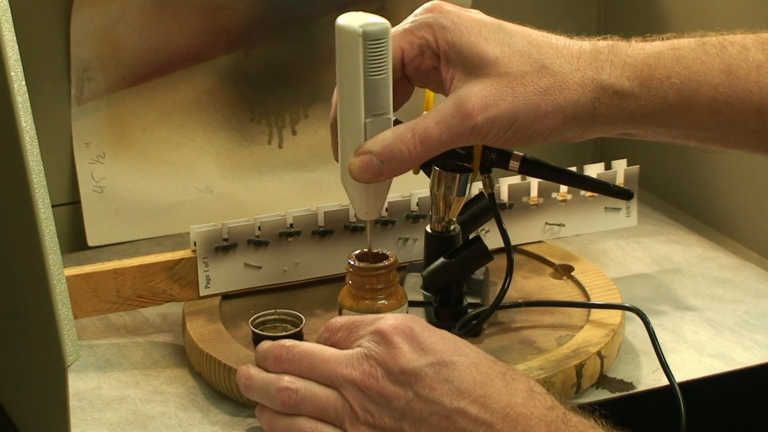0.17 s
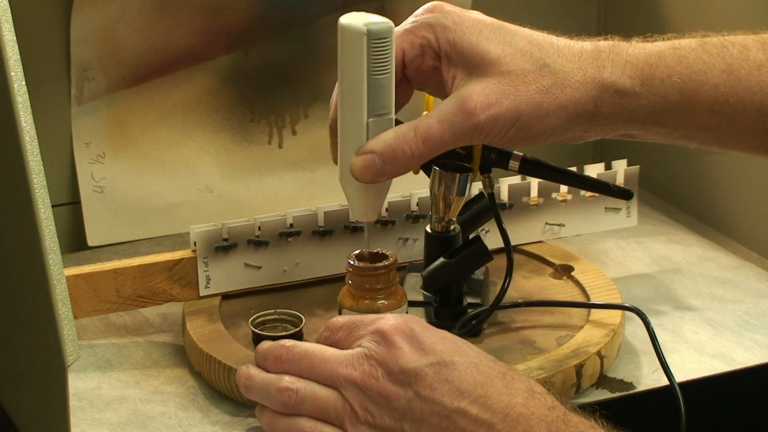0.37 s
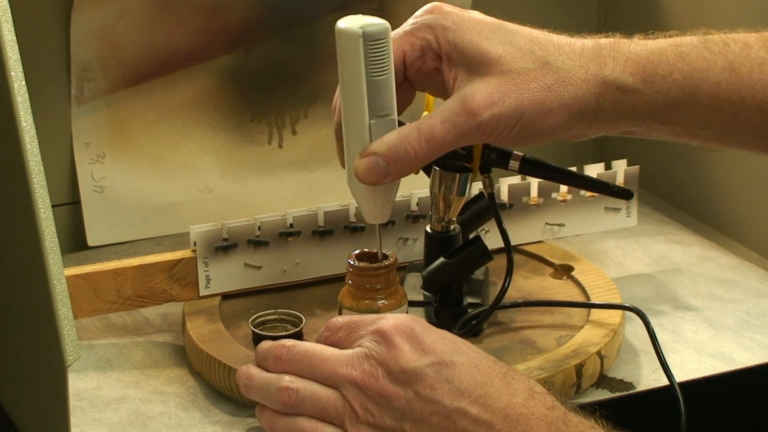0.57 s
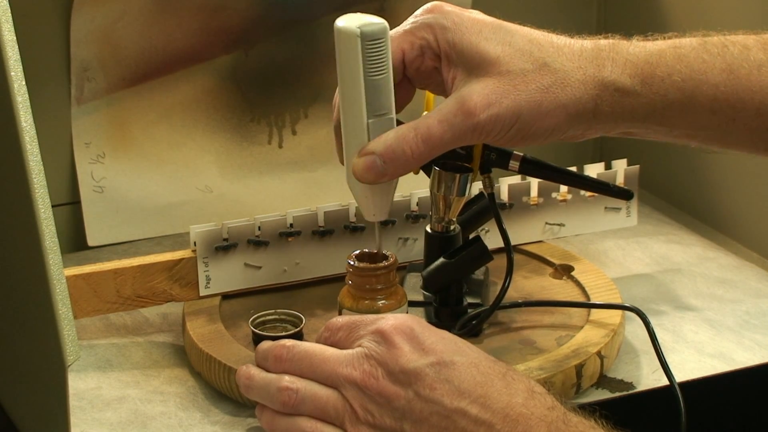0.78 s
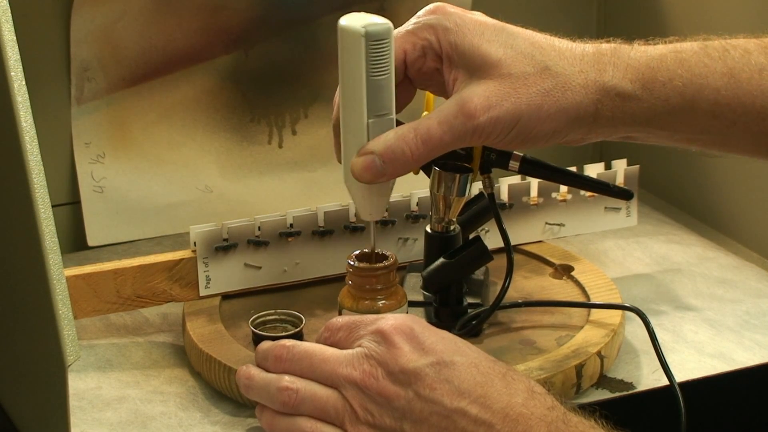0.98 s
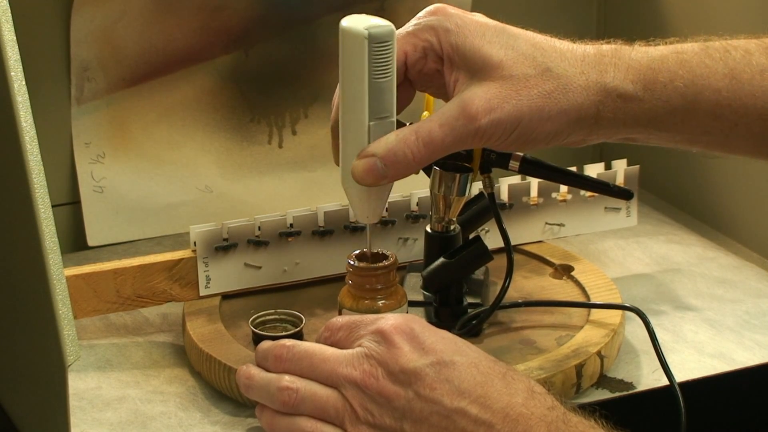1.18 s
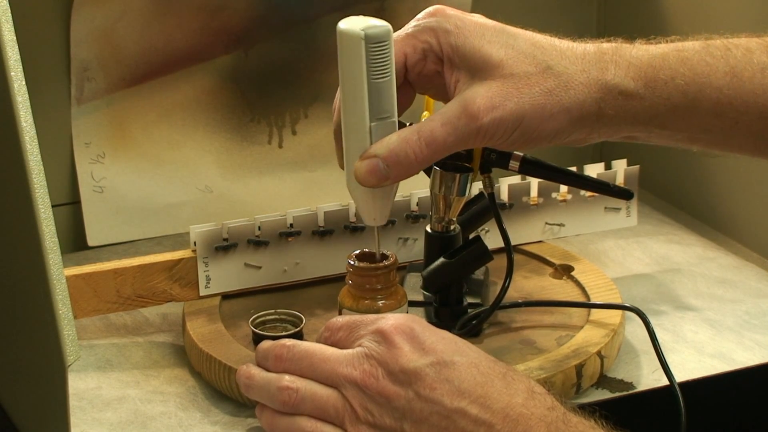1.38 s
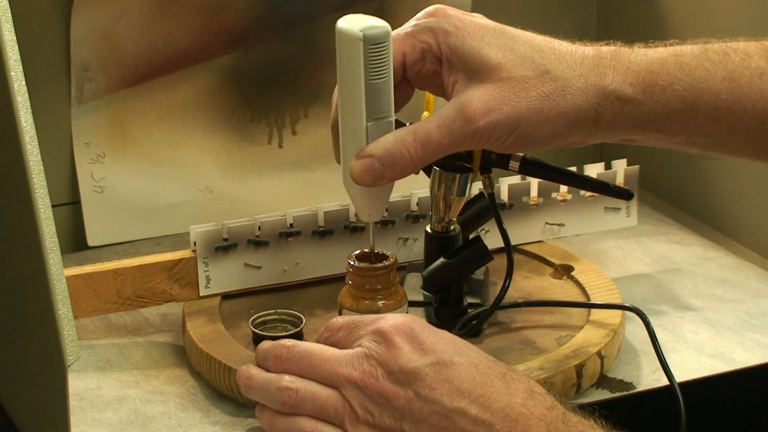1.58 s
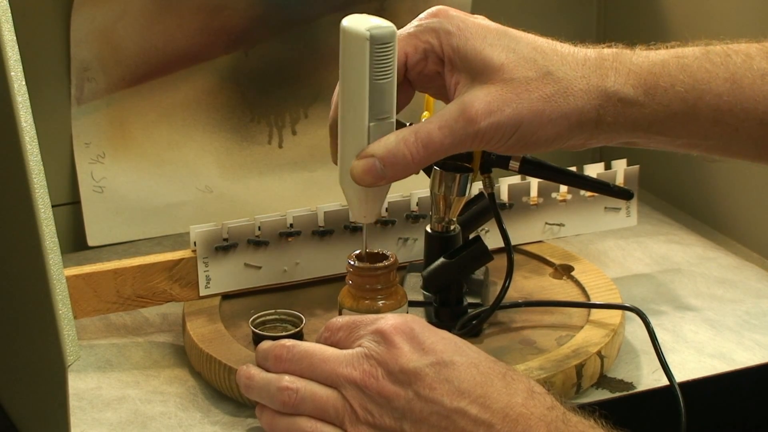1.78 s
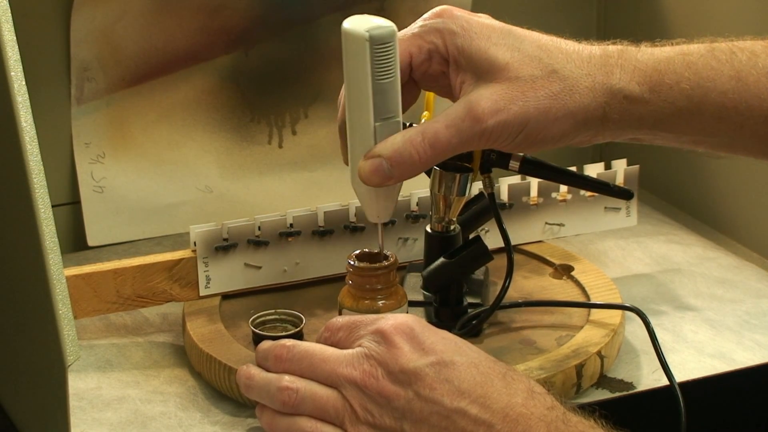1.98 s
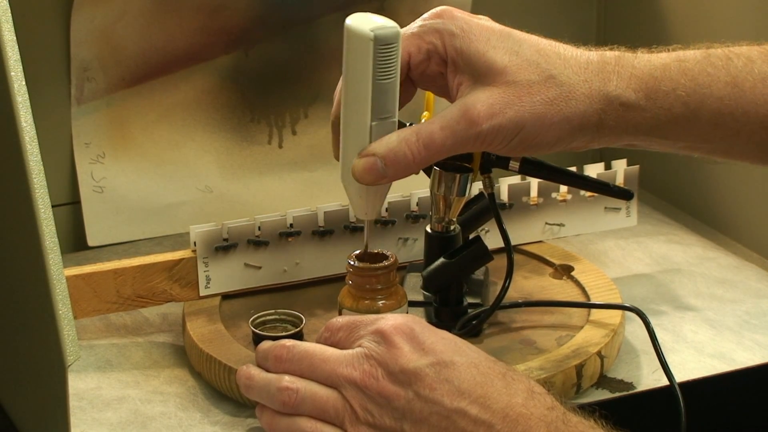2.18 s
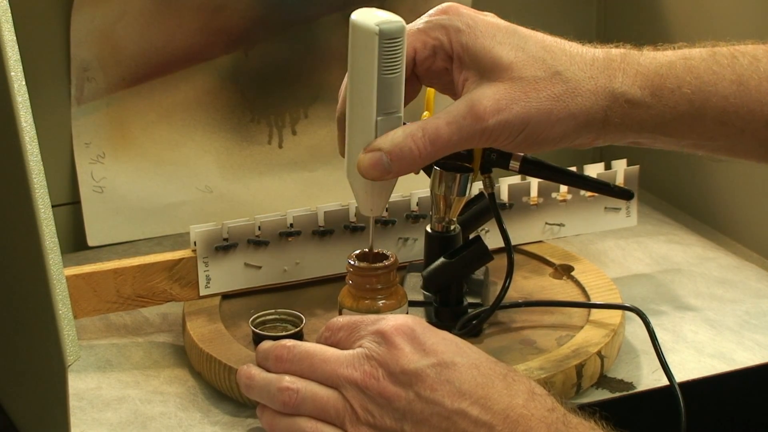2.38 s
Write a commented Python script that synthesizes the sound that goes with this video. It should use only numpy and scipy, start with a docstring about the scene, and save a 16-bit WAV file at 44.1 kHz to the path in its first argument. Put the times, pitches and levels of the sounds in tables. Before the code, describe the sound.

A small electric stirrer knocks and rattles inside a glass jar in irregular bursts, with sharp clicking slaps on the rim early and near the end, over a faint throbbing whine and soft hiss, close in a small workshop.

```python
"""The ring of a last knock dies away under soft hiss and a faint, throbbing motor whine; then knocking starts.
A handheld electric stirrer slows down in a small glass jar of paint on a wooden board, in a quiet workshop.
Its disc knocks and chatters on the wet glass, exciting decaying modes of jar and board plus metallic ticks.
In three short bouts the dry shaft slaps the rim: cracks and skids of tiny clicks through sharp resonances.
The whine is brush noise through the resonances of a plastic shell, with one wandering sine tone."""
import sys
import numpy as np
from scipy import signal
from scipy.fft import rfft, irfft
from scipy.io import wavfile
from scipy.ndimage import uniform_filter1d

SR = 44100
rng = np.random.default_rng(int(sys.argv[2]) if len(sys.argv) > 2 else 0)


def waveform_to_disk(signal):
    """Save audio, clipped to [-1, 1], as 16-bit WAV at the path in sys.argv[1]."""
    frames = np.transpose(np.atleast_2d(signal))
    scaled = np.clip(frames, -1, 1) * 32767
    samples = np.round(scaled).astype(np.int16)
    wavfile.write(sys.argv[1], SR, samples)


def voltage_ratio(level):
    """Linear amplitude factor for a level in decibels (scalar or array-like)."""
    return 10 ** (np.asarray(level, float) / 20)


N = 112455  # length in samples


def evened(x):
    """Scales a signal to an rms of one."""
    return x / np.sqrt(np.mean(x ** 2) + 1e-20)


def read(points, hz):
    """Reads a (Hz, value) table along a logarithmic pitch axis."""
    f, value = np.transpose(points)
    return np.interp(np.log(hz + 1), np.log(f + 1), value)


def curve(points):
    """Draws straight lines between (s, value) points over the whole scene."""
    return np.interp(np.arange(N) / SR, *np.transpose(points))


def add(mix, s, sound):
    """Mixes a sound in at s seconds, trimming whatever falls outside."""
    at = round(s * SR)
    part = mix[max(at, 0):][:len(sound) + min(at, 0)]
    part += sound[max(-at, 0):][:len(part)]


def colour(x, points):
    """Minimum-phase filter with the given (Hz, dB) spectrum, so that no sound comes before its cause."""
    hz = abs(np.fft.fftfreq(2048, 1 / SR))
    log_gain = np.log(voltage_ratio(np.maximum(read(points, hz), -70)))
    response = np.fft.ifft(np.exp(np.conj(signal.hilbert(log_gain)))).real[:1024]
    return signal.oaconvolve(x, response)[:len(x)]


def resonate(x, hz, width):
    """One resonance: a complex one-pole filter whose ringing decays faster the wider it is."""
    r = np.exp(-np.pi * width / SR)
    return 2 * signal.lfilter([1 - r], [1, -r * np.exp(2j * np.pi * hz / SR)], x).real


def clicks(size, per_s, spread_db):
    """Single-sample clicks at random times, of either sign and with random strengths."""
    strength = voltage_ratio(spread_db * np.minimum(rng.exponential(1, size), 4))
    sign = rng.choice([-1, 1], size)
    return strength * sign * (rng.random(size) < per_s / SR)


# spectrum of air and hiss: pitch_hz [Hz], relative density_db [dB per Hz]
AIR_SPECTRUM = [(20, 3.5), (60, -0.5), (110, -0.5), (170, -11), (1000, -15.5), (2500, -16), (4600, -21),
                (8000, -12), (11000, -21.5), (16000, -18.5)]
# likeness of the left and right hiss: pitch_hz [Hz], correlation [0 to 1]
AIR_LIKENESS = [(30, 1), (120, 0.6), (500, 0.057), (4000, 0.4), (9000, 0.68), (12000, 1)]


def air():
    """Workshop air and microphone hiss: shaped stereo noise, alike left and right by frequency."""
    level_db = -47.5
    hz = np.fft.rfftfreq(N, 1 / SR)
    shared, other = rfft(rng.standard_normal((2, N)))
    same = read(AIR_LIKENESS, hz)
    right = same * shared + np.sqrt(1 - same ** 2) * other
    noise = irfft(np.array([shared, right]) * voltage_ratio(read(AIR_SPECTRUM, hz)), N)
    return voltage_ratio(level_db) * evened(noise)


# decay of the room: pitch_hz [Hz], t60_s [s]
ROOM_DECAY = [(300, 0.26), (2000, 0.21), (6000, 0.18), (14000, 0.13)]


def room(x):
    """Sparse reflections dying band by band, partly alike in the two ears."""
    alike = 0.867  # left-right correlation
    slots = np.arange(130, SR // 2 - 20, 20)  # one reflection somewhere in each 20 samples
    at = slots + rng.integers(0, 20, (3, len(slots)))
    taps = np.zeros((3, SR // 2))
    np.put_along_axis(taps, at, rng.choice([-1., 1.], at.shape), 1)
    stereo = alike * taps[0] + np.sqrt(1 - alike ** 2) * taps[1:]
    hz, t, z = signal.stft(stereo, SR, nperseg=128)
    decay = voltage_ratio(-60 * t / read(ROOM_DECAY, hz)[:, None])
    tail = signal.istft(z * decay, SR, nperseg=128)[1]
    return signal.fftconvolve(x[None], tail / np.linalg.norm(tail[0]), axes=1)[:, :N]


# slowing of the shaft: time_s [s], speed [turns per second]
SHAFT_SPEED = [(0, 56.4), (1.2, 44.5), (2.55, 37)]


def turning():
    """Shaft angle in radians: the running sum of its speed."""
    return 2 * np.pi * np.cumsum(curve(SHAFT_SPEED)) / SR


# resonances of the plastic shell: pitch_hz [Hz], nominal width_hz [Hz], level_db [dB]
SHELL_MODES = [(3634, 197, -3.5), (5960, 320, -13), (8700, 1600, -10), (11740, 520, -19.5),
               (194.2, 5.3, -11.5), (494, 69, -11)]


def motor():
    """Brush noise bursts at three contacts a turn through the shell; a singing tone; all throbs once a turn."""
    level_db, throb, brush_sharpness = -50, 0.35, 0.9
    sing_hz, sing_wander_hz, sing_db = 3530, 14, -2  # centre, rms wander, level against the whine
    turn = turning()
    brush = rng.standard_normal(N) * np.exp(brush_sharpness * np.cos(3 * turn))
    whine = np.zeros(N)
    for hz, width, db in SHELL_MODES:
        # two passes, each broader than the nominal width, give steeper skirts
        once = resonate(brush, hz, width * 2.1)
        whine += voltage_ratio(db) * evened(resonate(once, hz, width * 2.1))
    wander = evened(uniform_filter1d(rng.standard_normal(N), 700))
    phase = 2 * np.pi * np.cumsum(sing_hz + sing_wander_hz * wander) / SR
    sing = voltage_ratio(sing_db) * np.sqrt(2) * np.sin(phase)
    return voltage_ratio(level_db) * (whine + sing) * (1 + throb * np.cos(turn + 1.35))


# modes of jar and board: pitch_hz [Hz]
JAR_PITCHES = [240, 330, 430, 520, 703, 770, 1079, 1251, 1472, 1706, 1845, 1917, 1965, 2022, 2234, 2450,
               2620, 2840, 3350, 3600]
# level of each mode: level_db [dB]
JAR_LEVELS = [-28, -23, -20.5, -15.5, -6, -6, -10.5, -8.5, -19, -10, -6.5, -12.5, -15.5, -15, -9.5, -15,
              -17, -16, -11.5, -14.5]
# decay of each mode: t60_s [s]
JAR_DECAYS = [.06, .045, .045, .05, .065, .055, .05, .04, .04, .03, .05, .075, .27, .09, .045, .035, .03,
              .035, .02, .02]


def ring(low_db, spot):
    """Sum of the dying modes of jar and board; neighbours swing in opposite sense."""
    glass_low_hz, glass_high_hz, clear_hz = 1600, 2150, 1965  # glass band and its one clear ring
    upper_share = 0.53  # upper board modes follow the lower in part
    spot_db, spot_detune = 2.5, 0.007  # spread of mode level and relative pitch from spot to spot
    swing_in_cycles = 0.08
    hz, db, t60 = np.array([JAR_PITCHES, JAR_LEVELS, JAR_DECAYS])[:, :, None]
    t = np.arange(SR // 3) / SR
    sign = (-1.) ** np.arange(len(hz))[:, None]
    board_db = low_db * ((hz < glass_low_hz) + upper_share * (hz > glass_high_hz))
    level = db + board_db + spot_db * spot[0] - 60 * t / t60
    swing_in = 1 - np.exp(-t * hz / swing_in_cycles)
    pitch = hz * (1 + spot_detune * spot[1] * (hz != clear_hz))  # the clear ring stays in tune
    return (sign * voltage_ratio(level) * swing_in * np.sin(2 * np.pi * pitch * t)).sum(0)


# slaps on the dry rim: start_s [s], strength_db [dB], skid_s [s, fall to 1/e], jar_ring_db [dB]
RIM_SLAPS = [(0.358, -17.5, 0.0022, -24.5), (0.3774, -14, 0.0047, -16), (0.4014, -13, 0.0041, -18.5),
             (0.6182, -11.5, 0.003, -26), (0.621, -10.5, 0.0044, -35), (0.6388, -9.5, 0.011, -43),
             (0.655, -19.5, 0.0063, -41), (0.6676, -9.5, 0.0085, -50), (2.234, -12, 0.0033, -24),
             (2.253, -10, 0.0056, -19.5), (2.2738, -12, 0.0028, -40), (2.275, -16, 0.015, -44),
             (2.298, -28, 0.0037, -52)]
# broad tone of the dry rim: pitch_hz [Hz], gain_db [dB]
RIM_TONE = [(400, -25), (730, -7.5), (1400, -9), (1900, -6.5), (3020, 0), (4090, -2), (4660, 3), (6330, 8),
            (9920, -10), (12000, -17), (16000, -6)]
# sharp resonances of the rim: pitch_hz [Hz], width_hz [Hz], relative level_db [dB]
RIM_MODES = [(2650, 78, -1.5), (3485, 390, 0), (4065, 130, 2.5), (5700, 670, -6), (11460, 340, -7)]


def slaps():
    """A sharp crack, then a skid of tiny clicks, through the dry rim; each also rings the jar, some faintly."""
    crack, skid_db, skid_per_s, skid_spread_db = 0.72, -8.5, 6000, 3
    force, jar, t = np.zeros(N), np.zeros(N), np.arange(1500) / SR
    for s, db, skid_s, ring_db in RIM_SLAPS:
        grains = evened(clicks(len(t), skid_per_s, skid_spread_db))
        slap = voltage_ratio(skid_db) * grains * np.exp(-(t / skid_s) ** 1.56)
        slap[:2] += crack
        add(force, s, voltage_ratio(db) * slap)
        add(jar, s, voltage_ratio(ring_db) * ring(-21, np.zeros(2)))
    rings = sum(voltage_ratio(db) * resonate(force, hz, width) for hz, width, db in RIM_MODES)
    return jar + colour(force, RIM_TONE) + 3.05 * rings


TICK_T60_S = 0.028  # decay of the metal disc's tick
# chatter of the disc dragging on the glass: time_s [s], level_db [dB, before the throb]
DRAG_LEVEL = [(.2, -97), (.22, -25), (.29, -67), (.51, -77), (.53, -29.5), (.61, -58), (.765, -54),
              (.78, -24.5), (.88, -43.5), (.94, -65), (1.0, -57), (1.01, -40.5), (1.12, -31), (1.19, -67),
              (1.245, -56), (1.26, -30.5), (1.42, -30.5), (1.47, -66), (1.51, -30), (1.64, -36),
              (1.73, -26.5), (1.76, -80), (1.895, -80), (1.91, -22), (2.0, -33), (2.1, -35.5), (2.18, -71)]
# tone of the disc's bright tick, here and in the knocks: pitch_hz [Hz], gain_db [dB]
TICK_TONE = [(1500, -73), (3500, 10.5), (5000, -3), (6200, 7), (7500, -4), (15500, -21.5)]


def drag():
    """Small random taps at five spots of the glass keep the jar ringing while the disc drags."""
    taps_per_s, spread_db = 160, 3  # for each spot
    low_db, tick_db, throb = 5.5, -18, 1  # the disc presses hardest once a turn
    press = voltage_ratio(curve(DRAG_LEVEL)) * (1 + throb * np.cos(turning() + 1.73))
    t = np.arange(900) / SR
    spots = rng.standard_normal((5, 2, len(JAR_PITCHES), 1))
    out = np.zeros(N)
    for spot in spots:
        body = ring(low_db, spot)[:SR // 5]
        fizz = rng.standard_normal(len(t)) * voltage_ratio(tick_db - 60 * t / TICK_T60_S)
        body[:len(t)] += colour(fizz, TICK_TONE)
        taps = evened(clicks(N, taps_per_s, spread_db)) * press
        out += signal.oaconvolve(taps, body / np.linalg.norm(body))[:N]
    return out / np.sqrt(len(spots))


# knocks of the disc in the paint: start_s [s], strength_db [dB], board_db [dB, board modes],
# tick_db [dB, bright tick against the knock]
DISC_KNOCKS = [(0.2088, -2, -10.5, -24.5), (0.231, -10, -5, -18), (0.248, -14.5, -3, -25),
               (0.263, -15.5, -4, -24), (0.514, -4, -7.5, -18), (0.536, -3, -19, -28),
               (0.549, -19, -27, -30), (0.564, -20, 6, -14.5), (0.582, -16.5, -7, -24),
               (0.771, -9.5, -3, -14), (0.825, -19.5, -7, -9), (0.844, -19, 4, -15), (0.869, -7, 2, -9),
               (1.006, -22, 3, -11), (1.065, -17, 1.5, -13.5), (1.087, -1, -5.5, -19),
               (1.118, -12.5, 3.5, -13), (1.252, -13.5, 1, -15), (1.313, -3, -12, -19.5),
               (1.339, -6.5, -7.5, -12), (1.364, -15, 1, -28), (1.387, -2.5, -4, -14.5),
               (1.48, -20, 6, -27), (1.501, -4.5, 0.5, -12.5), (1.525, -9, -1.5, -14),
               (1.543, -5.5, -3.5, -21.5), (1.559, -12, -18, -23), (1.596, -16.5, 5.5, -9.5),
               (1.66, -0.5, -5.5, -16), (1.683, 0, -3, -17.5), (1.707, -14, -41, -8),
               (1.9032, -10, 4, -10.5), (1.93, -7.5, 2, -11), (1.951, -5.5, 1, -11), (1.974, -4.5, 3, -13),
               (1.987, -8, -6, -4), (2, -6, 1, -12.5), (2.025, -21.5, 5, -14), (2.049, -14, 2, -14),
               (2.072, -5.5, -0.5, -16), (2.089, -23, 3, -10), (2.135, -24.5, 4, -38)]
# nominal delays of the bounces after the push: delay_s [s]
BOUNCE_DELAYS = [0.002065, .0043]
# strength of those bounces: level_db [dB]
BOUNCE_LEVELS = [-5, -5]


def knocks():
    """Each knock is a push with two quick uneven bounces, plus a bright tick of the metal disc."""
    push_s, bounce_scatter = 0.00007, 0.3  # push width, relative scatter of the delays
    tick_rise_s, tick_spot_db = 0.0012, 2.5  # each tick has its own colour
    out, ticks, t = np.zeros(N), np.zeros(N), np.arange(2000) / SR
    tick_shape = voltage_ratio(-60 * t / TICK_T60_S) * (1 - np.exp(-t / tick_rise_s))
    pushes_db = [0, *BOUNCE_LEVELS]
    for s, db, low_db, tick_db in DISC_KNOCKS:
        scatter = 1 + bounce_scatter * rng.uniform(-1.13, 1, 3)
        delays = np.array([0, *BOUNCE_DELAYS]) * scatter
        force = np.zeros(400)
        for delay, push_db in zip(delays, pushes_db):
            force += voltage_ratio(push_db) * np.exp(-((t[:400] - delay - 0.0004) / push_s) ** 2)
        spot = rng.standard_normal((2, len(JAR_PITCHES), 1))  # each knock lands on another spot
        add(out, s, voltage_ratio(db) * signal.oaconvolve(ring(low_db, spot), force / np.sum(force)))
        tint = np.array(TICK_TONE) + [0, tick_spot_db] * rng.standard_normal((len(TICK_TONE), 1))
        tick = colour(rng.standard_normal(len(t)) * tick_shape, tint)
        add(ticks, s, voltage_ratio(db + tick_db) * tick)
    # a knock just before the start, still ringing
    add(out, -0.002, voltage_ratio(-35.5) * ring(-28, rng.standard_normal((2, len(JAR_PITCHES), 1))))
    return out + ticks


# pitches that the board radiates weakly: pitch_hz [Hz], width_hz [Hz]
BOARD_DIPS = [(610, 180), (1410, 94)]


def board(x):
    """Notches where the wooden board radiates weakly."""
    for hz, width in BOARD_DIPS:
        x = signal.lfilter(*signal.iirnotch(hz, hz / width, SR), x)
    return x


def scene():
    """Knocks, drag and slaps with their room sound, over the motor and the air."""
    radiates_above_hz, room_db = 179, -7.5
    contacts = board(knocks() + drag()) + slaps()
    high_pass = signal.butter(4, radiates_above_hz, "high", fs=SR, output="sos")
    near = signal.sosfilt(high_pass, contacts)
    return near + voltage_ratio(room_db) * room(near) + motor() + air()


def band_limit(x):
    """A steep low-pass at the top of the band."""
    return signal.sosfilt(signal.butter(12, 16960, fs=SR, output="sos"), x)


def record(dry):
    """Limits the band with a steep low-pass and finishes the mix."""
    edge_hz = 15900
    low_pass = signal.firwin(511, edge_hz, window=("kaiser", 9), fs=SR)
    mix = signal.oaconvolve(dry, low_pass[None], "same")
    return band_limit(mix)


dry = scene()
out = record(dry)
waveform_to_disk(out)
```